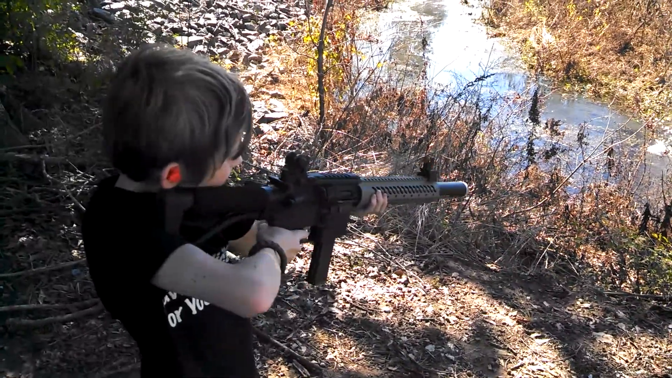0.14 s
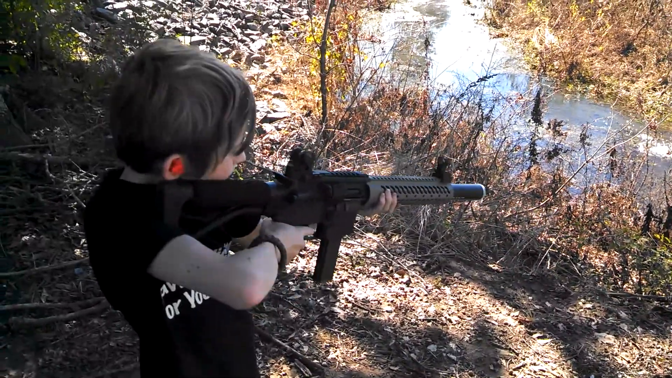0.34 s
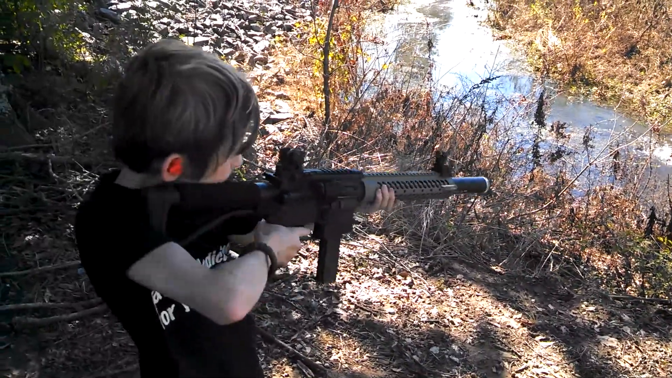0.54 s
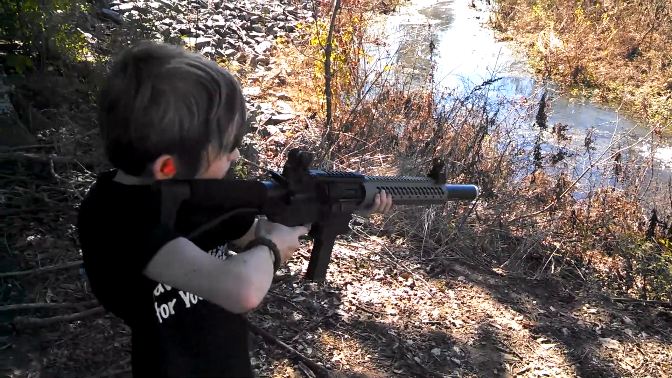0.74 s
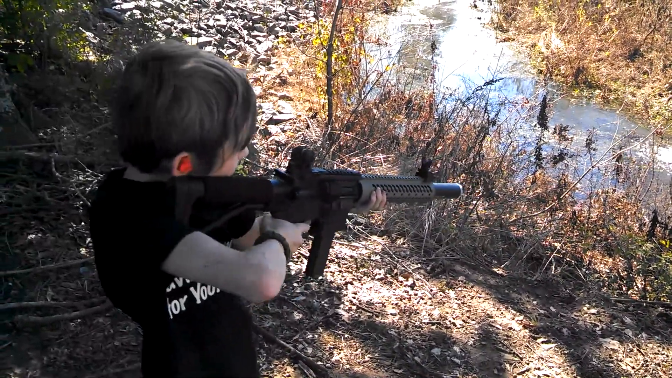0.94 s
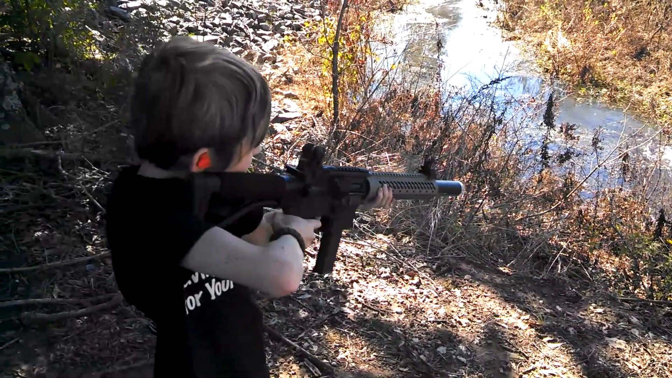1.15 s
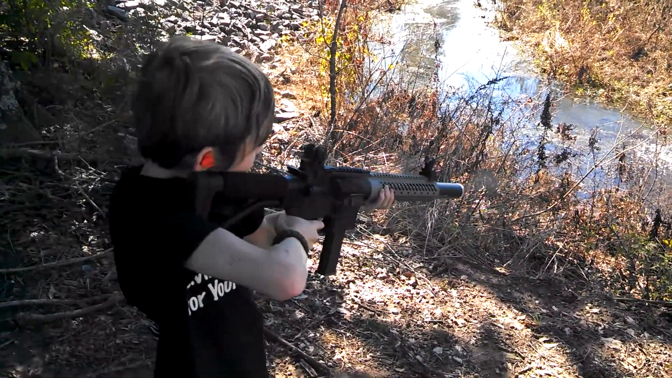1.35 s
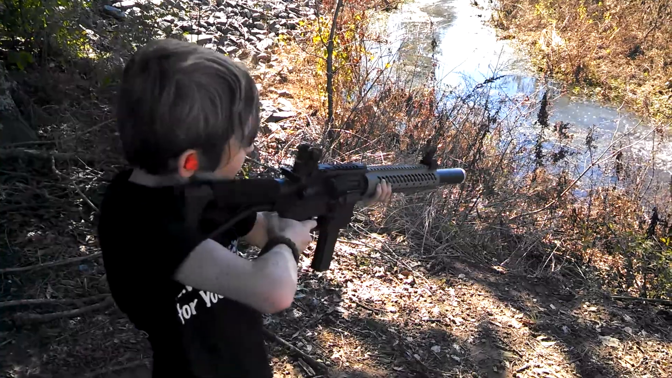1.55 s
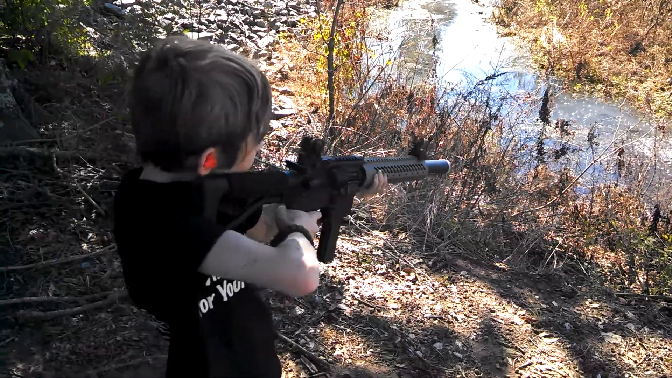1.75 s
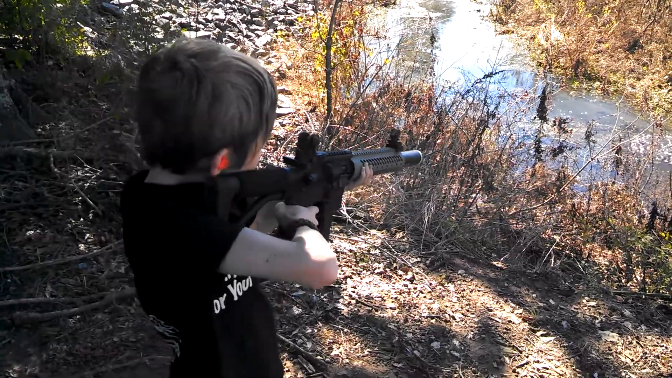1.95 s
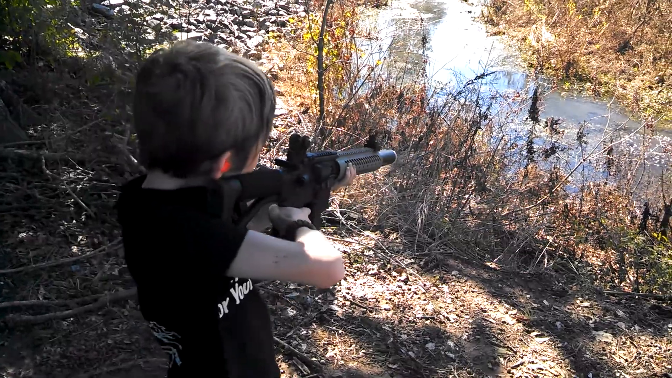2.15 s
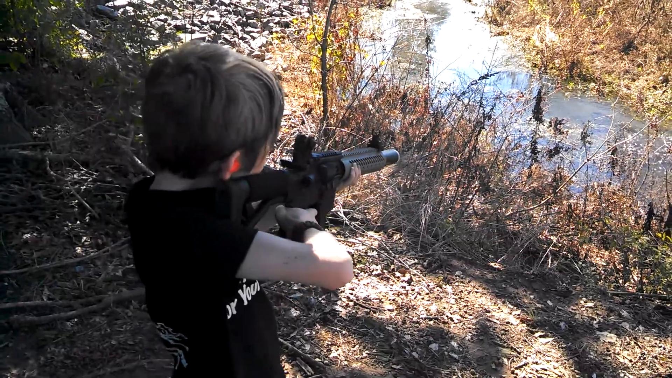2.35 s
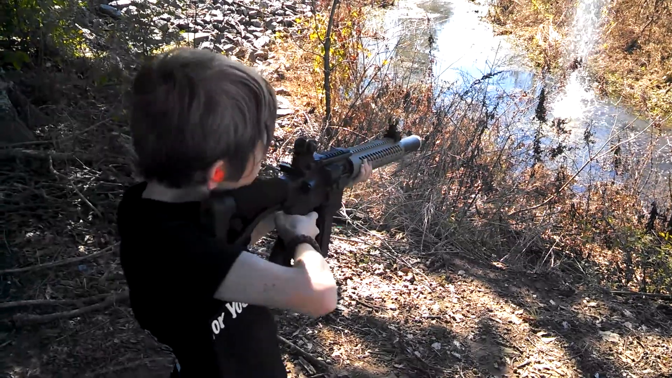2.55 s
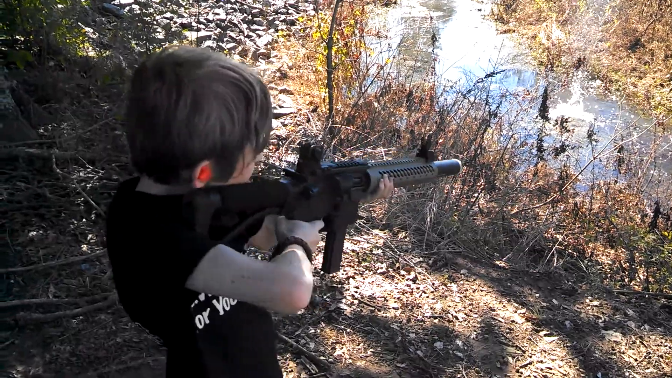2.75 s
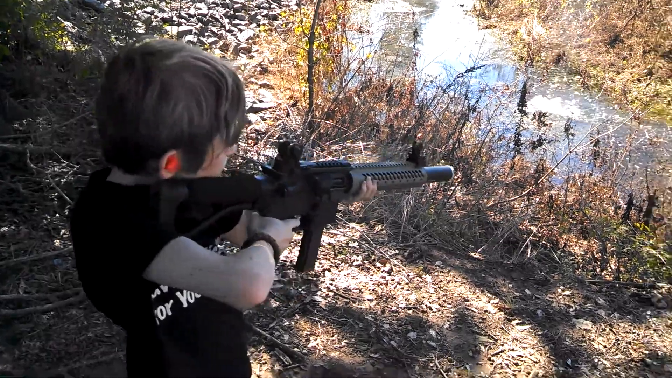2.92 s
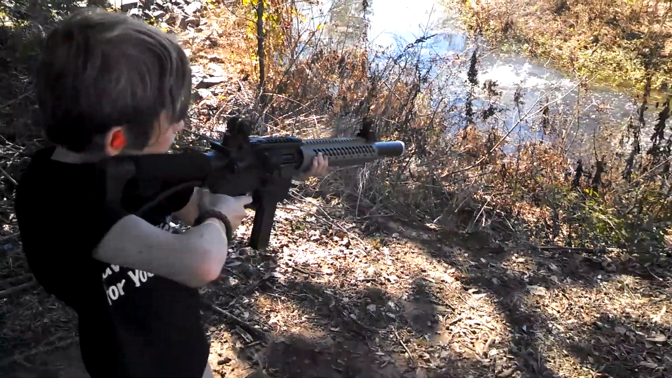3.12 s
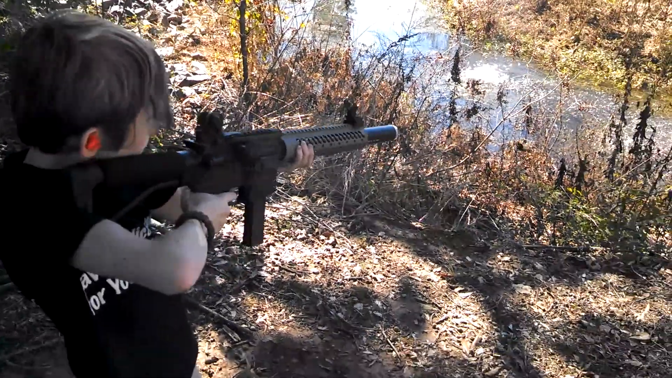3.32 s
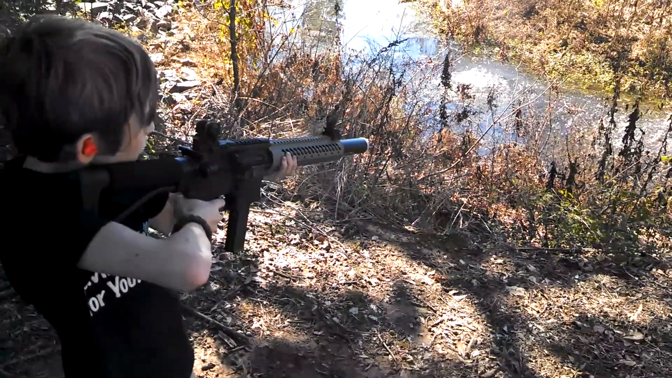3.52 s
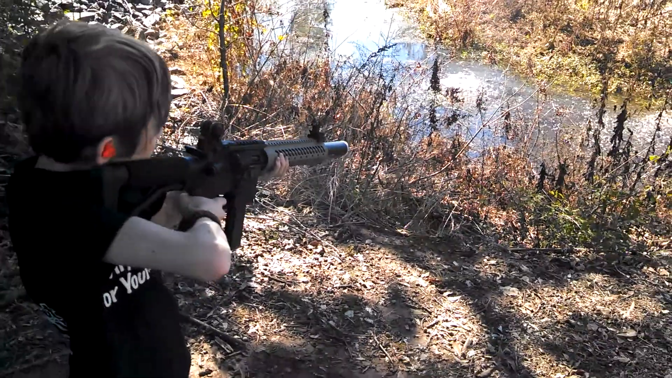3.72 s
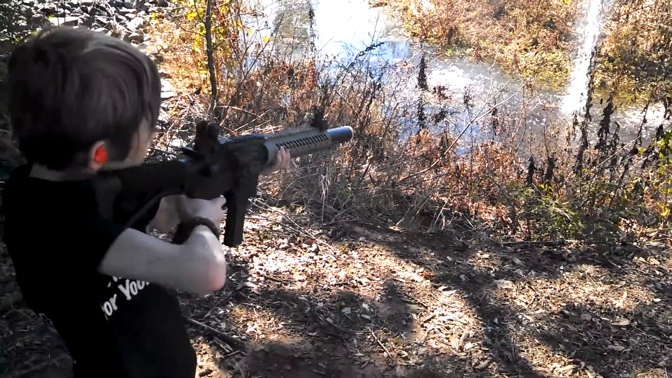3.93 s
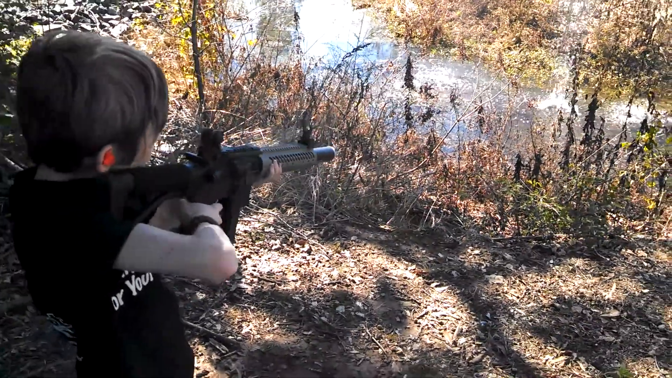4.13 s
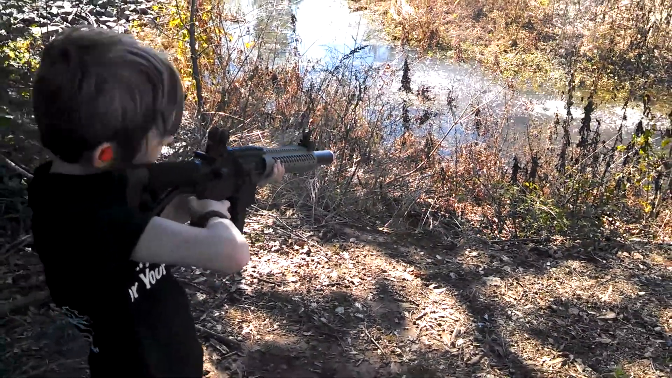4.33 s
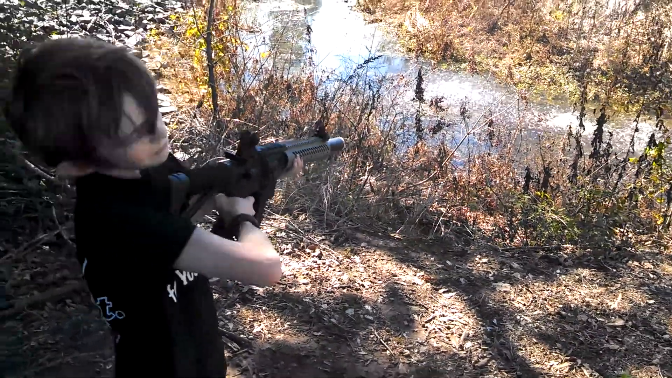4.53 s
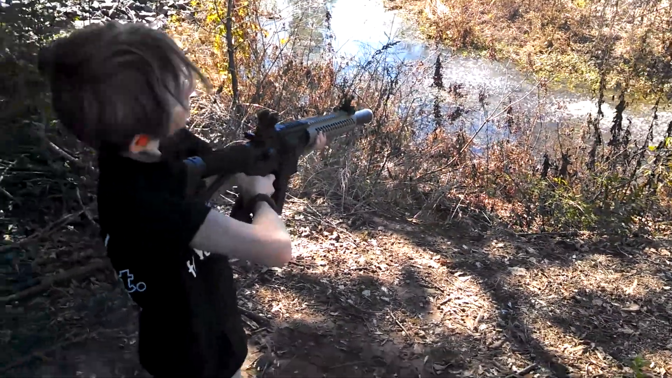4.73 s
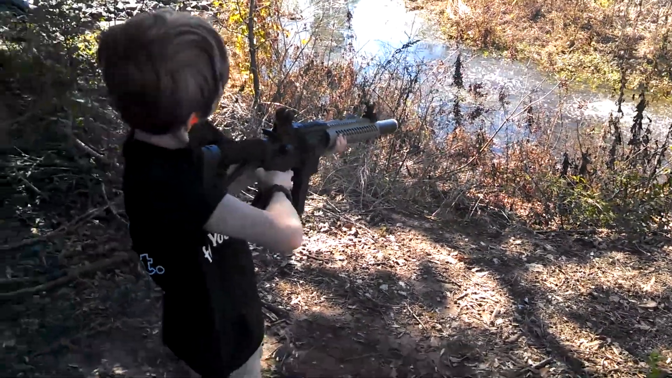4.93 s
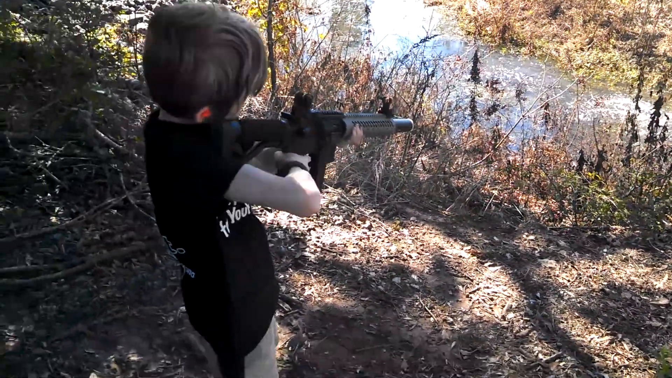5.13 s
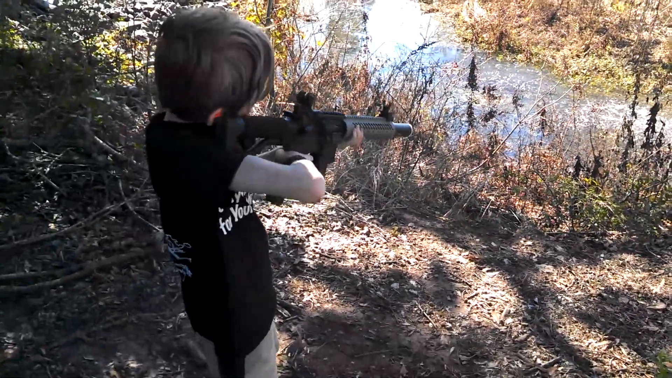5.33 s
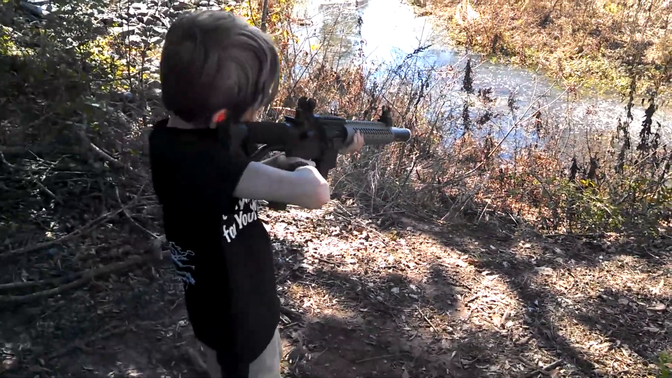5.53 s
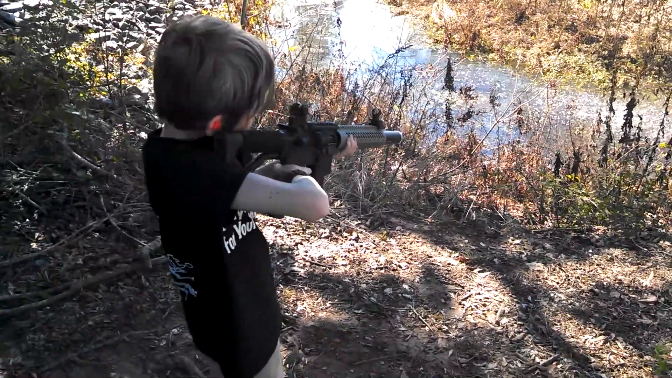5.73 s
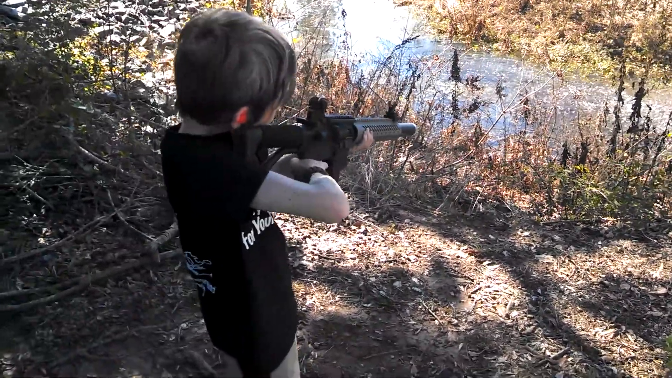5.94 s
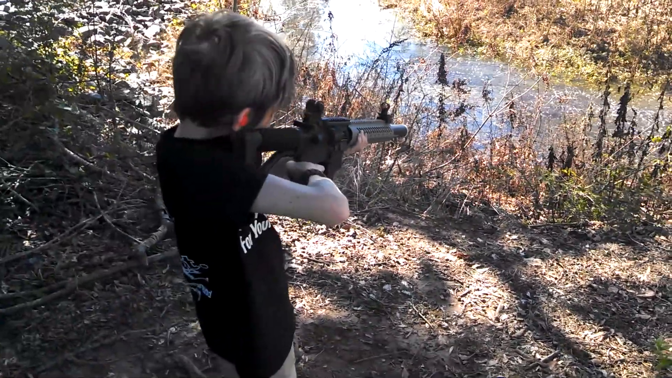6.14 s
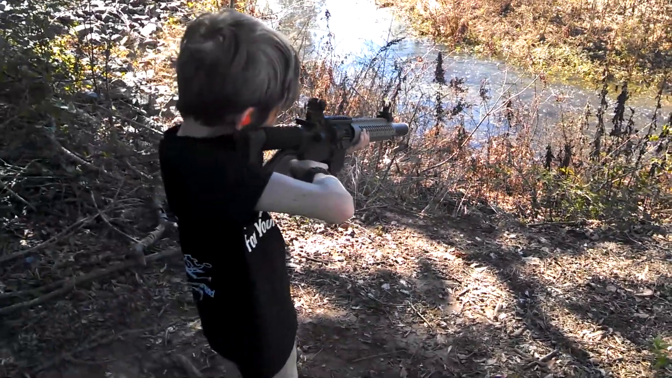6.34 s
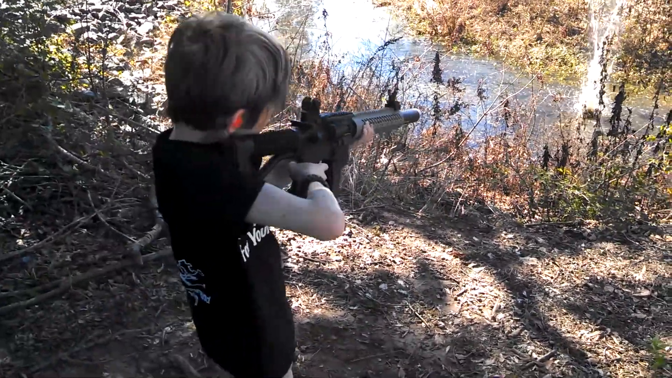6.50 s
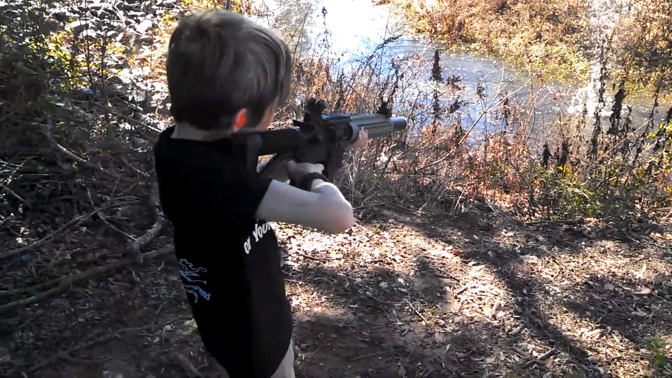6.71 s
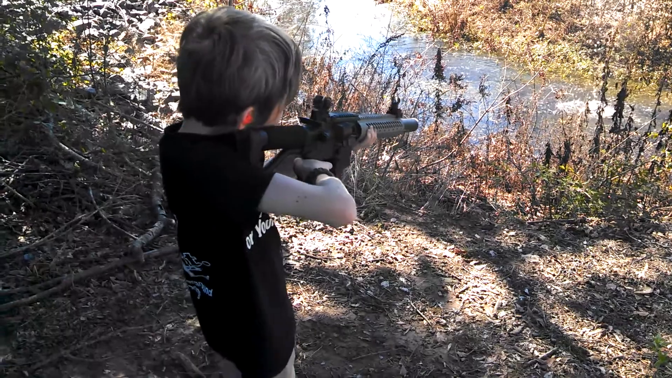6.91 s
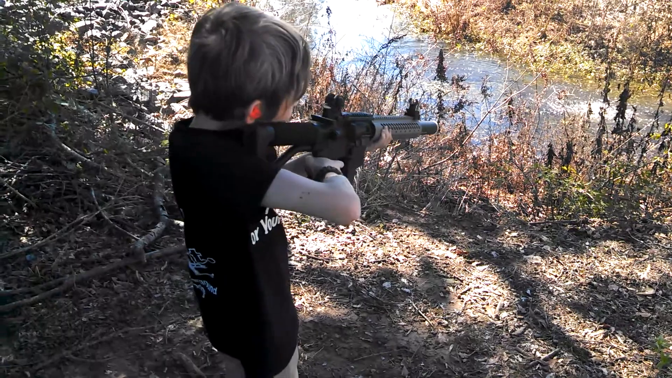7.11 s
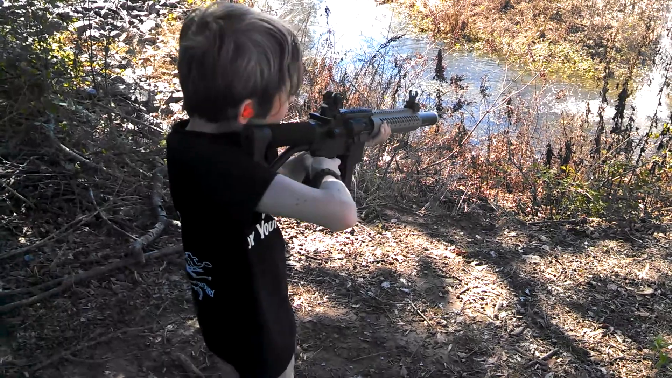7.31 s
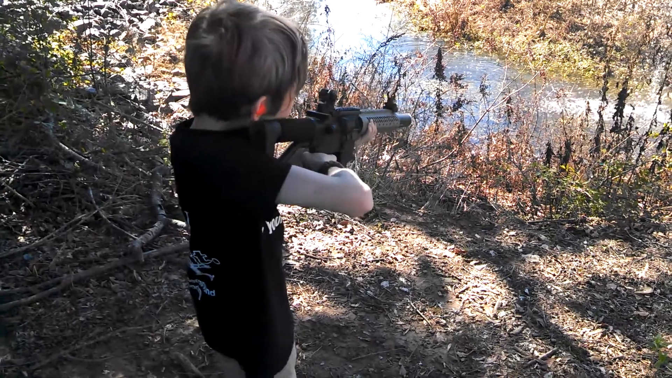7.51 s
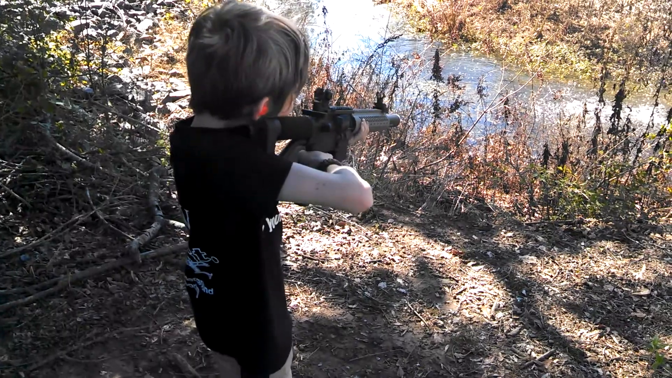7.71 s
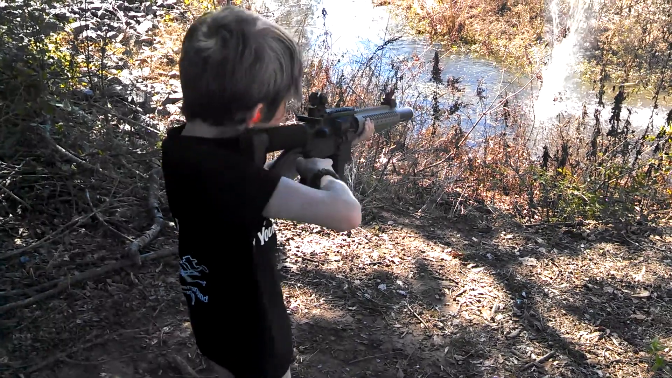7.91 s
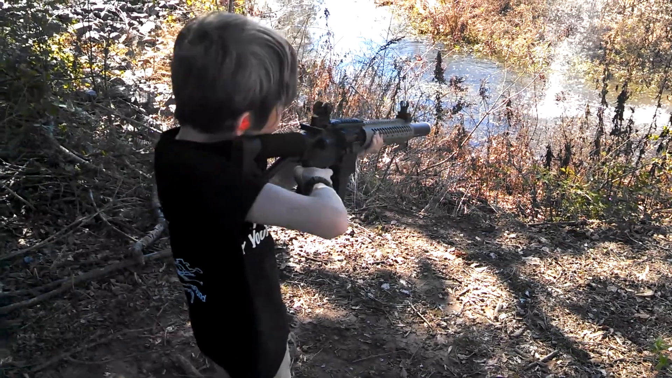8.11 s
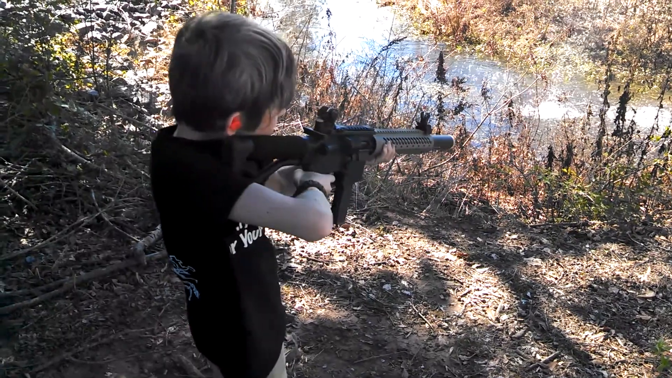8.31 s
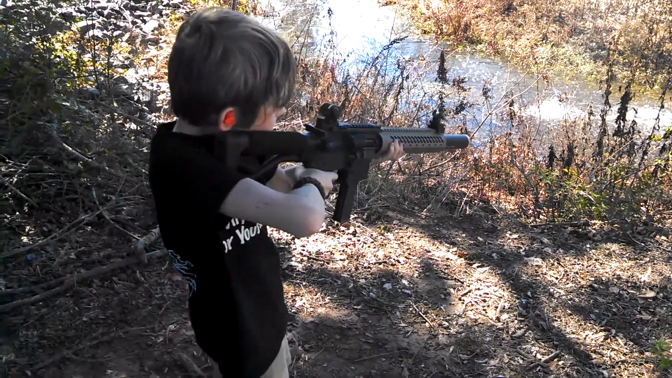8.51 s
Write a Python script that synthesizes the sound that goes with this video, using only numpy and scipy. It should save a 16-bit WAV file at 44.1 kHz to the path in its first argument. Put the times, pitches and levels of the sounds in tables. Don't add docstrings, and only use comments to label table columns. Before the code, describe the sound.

Outdoors on a brushy creek bank, a suppressed rifle fires eight separate shots close to a small stereo camera. Each is a short muffled thump with a gas hiss, a sharp metallic bolt clack, then a faint bullet splash and dull echo. Five shots come first, then a pause with twig snaps, rustling leaves, wind puffs and rising motor whine, then three more.

```python
import sys
import numpy as np
from scipy import signal
from scipy.fft import rfft, irfft, next_fast_len
from scipy.io import wavfile
from scipy.ndimage import uniform_filter1d

SR = 44100
rng = np.random.default_rng(int(sys.argv[2]) if len(sys.argv) > 2 else 0)


def unload_wav(signal):
    wavfile.write(
        sys.argv[1],
        SR,
        np.round(np.clip(np.atleast_2d(signal).T, -1, 1) * 32767).astype(np.int16),
    )


def linear_from_db(decibels):
    return 10 ** (np.asarray(decibels, float) / 20)


N = 381906


def evened(x):
    return x / np.sqrt(np.mean(x ** 2) + 1e-20)


def read(points, hz, column=1):
    table = np.array(points, float)
    return np.interp(np.log(hz + 1), np.log(table[:, 0] + 1), table[:, column])


def along(curve):
    return np.interp(np.arange(N) / SR, *np.transpose(curve))


def add(power, s, rise, t60, db):
    part = power[round(s * SR):][:round(1.2 * t60 * SR)]
    t = np.arange(len(part)) / SR
    pressure = linear_from_db(db - 60 * t / t60) * (1 - np.exp(-t / max(rise, 1e-4)))
    part += pressure ** 2


def flutter(samples, depth_db):
    slow = rng.standard_normal(N)
    for _ in range(2):
        slow = uniform_filter1d(slow, int(samples))
    return evened(linear_from_db(depth_db * evened(slow)))


def ring(x, hz, width):
    b, a = signal.iirpeak(hz, hz / width, SR)
    return signal.lfilter(b, a, signal.lfilter(b, a, x))


# (frequency [Hz], difference against sum [dB], likeness of the two [-1..1], phase turn [rad])
CAPSULE_PAIR = [(60, -6, -.5, 0.94), (300, -8, -0.45, 0.81), (700, -2.5, -0.14, 0.28),
                (1500, -1, .05, 0.083), (4000, 0.5, 0.28, 0.053), (8500, -0.5, 0.61, 0.05),
                (11000, 0, -.2, 0.1), (14000, -0.5, -.5, 0.084)]


def pair():
    hz = np.fft.rfftfreq(next_fast_len(N), 1 / SR)
    shared, own = rng.standard_normal((2, len(hz), 2)) @ [1, 1j]
    same = np.clip(read(CAPSULE_PAIR, hz, column=2), -1, 1)
    turn = np.exp(1j * read(CAPSULE_PAIR, hz, column=3))
    difference = same * turn * shared + np.sqrt(1 - same ** 2) * own
    spectra = np.array([shared, linear_from_db(read(CAPSULE_PAIR, hz)) * difference])
    return hz, spectra, irfft(spectra, next_fast_len(N))[:, :N]


def white_noise(white, shift):
    return np.roll(white[-1], shift, axis=1)


def heard(colour, white):
    hz, spectra, _ = white
    noise = irfft(linear_from_db(read(colour, hz)) * spectra, next_fast_len(N))
    return evened(np.roll(noise, rng.integers(N), axis=1)[:, :N])


# (blast time [s], blast level [dB], hammer level [dB], splash delay [s])
ROUNDS = [(0.5455, -4.5, -7, .1565), (1.4155, -4, -6, .17), (2.42, -4, -5, .1515), (3.263, -4, -6, .167),
          (3.8185, -3.5, -11, .1695), (6.436, -3.5, -3.5, .193), (7.184, -4.5, -10, .17),
          (7.851, -4.5, -9, .1745)]
# (thrown back [s], level [dB], slammed home [s], level [dB])
CYCLES = [(0.595, -14, 0.6045, -7), (1.4575, -13.5, 1.4725, -6.5), (2.4705, -11.5, 2.4765, -6),
          (3.3115, -12.5, 3.319, -5.5), (3.864, -12, 3.875, -5.5), (6.481, -11, 6.49, -4.5),
          (7.231, -11, 7.243, -6.5), (7.893, -12, 7.904, -7)]
LOCK_S, SPLASH_DB = .0078, -20
# (time [s], level [dB])
HAMMER = [(s - LOCK_S, hammer_db) for s, _, hammer_db, _ in ROUNDS]
BLAST = [(s, db) for s, db, _, _ in ROUNDS]
BOLT_BACK = [row[:2] for row in CYCLES]
BOLT_HOME = [row[2:] for row in CYCLES]
SPLASH = [(s + after, db + SPLASH_DB) for s, db, _, after in ROUNDS]
# (delay [s], rise [s], t60 [s], level [dB])
PARTS = [
    (HAMMER, [(0, 0.0026, .03, -18), (0, .001, .02, -22), (0, .001, 0.018, -19.5), (0, 0.0008, .016, -9)]),
    (BLAST, [(0, 0.0032, .1, -3.5), (0, 0.0013, 0.072, -7), (0, 0.00045, .05, -14), (0, 0.00045, .04, -9)]),
    (BLAST, [(0.031, 0.014, .3, -17.5), (0, .002, 0.45, -29), (0, 0.0012, .3, -22), (0, 0.0012, 0.29, -9.5)]),
    (BOLT_BACK, [(0, .002, .04, 3.5), (0, .001, 0.03, -9.5), (0, .001, .03, -15), (0, .002, .04, -12)]),
    (BOLT_HOME, [(0, .003, 0.088, -3), (0, .0015, 0.055, -8.5), (0, .0012, .045, -12), (0, .001, 0.058, -4.8)]),
    (SPLASH, [(0.00051, 0.0033, .05, -15.5), (0.001, .002, 0.06, -10), (0, 0.0004, 0.045, -4.5), (0.0003, .0005, 0.03, -5.5)]),
]
# (frequency [Hz], density [dB per Hz])
THUD = [(25, -25.5), (50, 5), (100, 2), (250, -3.5), (450, -10.5), (900, -36.5), (2000, -59)]
BODY = [(150, -28), (400, -2), (900, 0.5), (1500, -5.5), (2300, -1.5), (4000, -10.5), (8000, -46.5)]
CLACK = [(700, -28.5), (1500, -3.5), (2500, 0), (4300, -0.5), (5500, -7), (8000, -29)]
GAS = [(800, -28.5), (2000, -6.5), (3500, 3), (6000, 1), (9000, -1), (13000, 2), (17000, -1)]


def rifle(white):
    power = np.zeros((4, N))
    for events, layers in PARTS:
        for s, db in events:
            for k, (delay, rise, t60, layer_db) in enumerate(layers):
                add(power[k], s + delay, rise, t60, db + layer_db)
    thud, body, clack, gas = np.sqrt(power)
    metal = body * flutter(60, 3.5) * heard(BODY, white)
    metal = metal + clack * flutter(40, 3.5) * heard(CLACK, white)
    return thud * heard(THUD, white) + metal + gas * flutter(30, 2.3) * heard(GAS, white)


# (delay [s], start pitch [Hz], end pitch [Hz], t60 [s], level [dB])
PUSHES = [
    (BLAST, (0, 479.5, 89.5, 0.1, -12)),
    (BLAST, (.0012, 1500, 500, .012, -13)),
    (BOLT_BACK, (.001, 331.5, 220, 0.035, -3)),
    (BOLT_HOME, (.002, 260, 90, 0.075, -4.5)),
]


def pushes():
    out, t = np.zeros(N), np.arange(6000) / SR
    for events, (delay, start_hz, end_hz, t60, push_db) in PUSHES:
        for (s, db), spread in zip(events, rng.uniform(.85, 1.15, len(events))):
            hz = spread * (end_hz + (start_hz - end_hz) * np.exp(-t / (.12 * t60)))
            swing = linear_from_db(db + push_db - 60 * t / t60) * np.sin(2 * np.pi * np.cumsum(hz) / SR)
            out[round((s + delay) * SR):][:len(t)] += swing
    return out * np.array([[-1.3], [.9]])


# (delay [s], rise [s], t60 [s], level [dB], centre [Hz], width [Hz])
ECHO = (0.17, 0.16, 0.03, -41.5, 3700, 1298)


def far_bank(white):
    delay, rise, t60, db, hz, width = ECHO
    power = np.zeros(N)
    for s, blast_db in BLAST:
        add(power, s + delay, rise, t60, blast_db + db)
    return np.sqrt(power) * evened(ring(white_noise(white, 0), hz, width))


# (time [s], peak level [dB], ring [Hz], brightness [dB])
TICKS = [(0.397, -43, 3463, -2), (0.459, -37.5, 2310, -2), (0.506, -39, 510, -3), (1.025, -42, 1100, -4),
         (0.5715, -10, 330, -9), (1.132, -41.5, 3900, -21.5), (1.225, -43, 3560, -3),
         (1.345, -33.5, 2070, -12), (1.38, -35.5, 2060, -4), (2.066, -42, 883, -11),
         (2.111, -36, 2090, -16), (2.156, -41, 4140, -13), (2.183, -42, 3710, 5), (5.066, -45, 4580, 4),
         (3.581, -30.5, 2070, -23), (3.599, -32.5, 2060, -11), (4.735, -45, 4600, 5),
         (4.595, -29.5, 2050, -12), (4.801, -31.5, 1100, -17), (5.153, -34.5, 3430, -4.5),
         (5.24, -29, 2050, -9), (5.251, -24, 2270, -12), (5.342, -38.5, 4590, 3),
         (5.609, -30.5, 3520, -3.5), (5.724, -27, 1480, -4), (5.824, -28, 3260, -6),
         (6.912, -42, 3170, -10.5), (7.661, -44, 3980, -15), (8.331, -38, 4500, -11), (8.509, -43, 789, -9)]
# (start [s], pitch [Hz], t60 [s], level [dB])
PLOP = (5.785, 450, 0.22, -42)
# (frequency [Hz], density [dB per Hz])
CRACK = [(2500, -31), (6000, 0.5), (16000, -3.5)]


def ticks(white):
    out, noise, bright = np.zeros((2, N)), white_noise(white, 60000), np.zeros(N)
    t = np.arange(1300) / SR
    for s, db, hz, bright_db in [*TICKS, *crackles()]:
        at = round(s * SR)
        burst = evened(ring(noise[:, at:at + len(t)], hz, 1.1 * hz)) * linear_from_db(-3.5 - 60 * t / .017)
        burst[0] += linear_from_db(2.5 - 60 * t / .008) * np.sin(2 * np.pi * hz * t)
        out[:, at:at + len(t)] += burst * linear_from_db(db) * (1 - np.exp(-t / 0.00036))
        add(bright, s, .0003, .015, db + bright_db + .3)
    s, hz, t60, db = PLOP
    t = np.arange(6000) / SR
    bubble = linear_from_db(db - 60 * t / t60) * (1 - np.exp(-t / .006)) * np.sin(2 * np.pi * hz * t)
    out[0, round(s * SR):][:len(t)] += bubble
    return out + np.sqrt(bright) * heard(CRACK, white)


# (time [s], level above calm [dB])
BREEZE = [(0, -3.5), (0.5, -2.5), (1.2, -0.5), (2.0, 0.5), (3.2, 0), (4.2, 0.5), (4.87, 2), (5.38, 10.5),
          (5.85, 17), (6.0, 11), (6.15, 3), (6.43, 0), (6.55, -7.5), (7.2, -4), (7.8, 0), (8.2, -8),
          (8.66, -2.5)]
CRACKLES_PER_S, CRACKLE_DB, CRACKLE_HZ, CRACKLE_SPREAD_DB = 44, -48.5, 3300, 2
CRACKLE_FOLLOWS, CALM_SHARE, FULL_BREEZE_DB = .7, .2, 14


def crackles():
    place, size, pitch, bright, luck = rng.random((round(CRACKLES_PER_S * N / SR), 5)).T
    s = (np.arange(len(place)) + place) / CRACKLES_PER_S * .99
    breeze_db = np.interp(s, *np.transpose(BREEZE))
    db = CRACKLE_DB + CRACKLE_FOLLOWS * breeze_db - CRACKLE_SPREAD_DB * np.log(size)
    hz = CRACKLE_HZ * (.9 + .3 * pitch ** 2)
    rows = np.transpose([s, np.minimum(db, -32), hz, -4 - 14 * bright])
    return rows[luck < np.maximum(breeze_db / FULL_BREEZE_DB, CALM_SHARE)]


# (time [s], level [dB])
MOTOR = [(0, -76), (2.4, -68), (4.2, -70), (4.5, -65), (5.7, -57.5), (6.0, -50.5), (6.42, -50),
         (6.5, -68.5), (8.66, -70)]
# (multiple of the shaft rate, level [dB])
WHINE = [(24, -65), (26, -61), (27, -67), (31, -68), (32, -64), (33, -58.5), (34, -57), (35, -63.5),
         (39, -56), (41, -61), (43, -60.5), (45, -69.5), (47, -63), (50, -67)]
# (frequency [Hz], level [dB])
BUZZ = [(3600, -98), (4200, -74), (4900, -84), (5750, -69), (6400, -84), (7700, -77), (8500, -74),
        (9600, -88)]
# (centre [Hz], width [Hz], level against the lines [dB])
HUM = (1290, 230, -11)
SHAFT_HZ = 176.27


def motor(white):
    size, thirds = next_fast_len(N), np.arange(60, 165) * SHAFT_HZ / 3
    lines = [(round(multiple) * SHAFT_HZ, db) for multiple, db in WHINE]
    lines += zip(thirds + .3, read(BUZZ, thirds) + 3.5 * rng.standard_normal(len(thirds)))
    spectrum = np.zeros((2, size // 2 + 1), complex)
    for (hz, db), phase in zip(lines, rng.random((len(lines), 2))):
        spectrum[:, round(hz * size / SR)] = linear_from_db(db) * np.exp(2j * np.pi * phase)
    whine = evened(irfft(spectrum, size)[:, :N])
    hz, width, db = HUM
    hum = linear_from_db(db) * evened(ring(white_noise(white, 30000), hz, width))
    return linear_from_db(along(MOTOR)) * (whine + hum)


# (start [s], stop [s], centre [Hz], width [Hz], throbs [per s], level [dB])
CRICKET = (2.12, 2.885, 12601, 1400, 48, -55)


def cricket(white):
    start, stop, hz, width, rate, db = CRICKET
    t = np.arange(N) / SR
    swell = np.clip((t - start) / .3, 0, 1) * (t < stop)
    throb = np.cos(np.pi * rate * t) ** 4
    return linear_from_db(db) * swell * throb * evened(ring(white_noise(white, 0), hz, width))


# (frequency [Hz], density [dB per Hz])
LEAVES = [(300, -20.5), (800, -3), (1300, -3), (2100, 3), (3300, 5), (6000, -1), (9000, -4), (12000, -13)]
WATER = [(40, -15.5), (120, 0.5), (350, -1.5), (700, -13), (1500, -29.5)]
HISS = [(8000, -24.5), (11000, -6), (13300, -0.5), (15000, -2.5), (17000, -4)]
# (leaves level [dB], fall [dB per s], water level [dB], fall [dB per s])
VALLEY = (-49, 24.5, -48, 31)
EARLIER_SHOT_S = -.2
LEAVES_DB, LEAVES_FOLLOW, HISS_DB, WATER_DB = -59, .5, -56.5, -69.5
RUSTLE_DB = -66
DUCK_DB, RECOVER_S = -12.5, 0.26
DRONE_DB, WHIRR_DB = -8, 3


def air(white):
    t, blasts = np.arange(N) / SR, np.array([EARLIER_SHOT_S] + [s for s, _ in BLAST])
    since = t - blasts[np.searchsorted(blasts, t) - 1]
    breeze_db, motor_db = along(BREEZE), along(MOTOR)
    leaves_db, leaves_fall, water_db, water_fall = VALLEY
    stirred = linear_from_db(LEAVES_DB + LEAVES_FOLLOW * np.maximum(breeze_db, 0))
    leaves = np.hypot(stirred, linear_from_db(leaves_db - leaves_fall * since))
    water = np.hypot(linear_from_db(WATER_DB), linear_from_db(water_db - water_fall * since))
    water = np.hypot(water, linear_from_db(motor_db + DRONE_DB))
    hiss = linear_from_db(HISS_DB + breeze_db + DUCK_DB * np.exp(-since / RECOVER_S))
    hiss = np.hypot(hiss, linear_from_db(motor_db + WHIRR_DB))
    rustle = linear_from_db(RUSTLE_DB + breeze_db) * flutter(70, 4.5) * flutter(700, 2.5) * heard(CRACK, white)
    return (rustle + leaves * flutter(150, 1.4) * flutter(1500, 1.6) * heard(LEAVES, white)
            + water * flutter(1200, 1.5) * heard(WATER, white) + hiss * flutter(300, 1.5) * heard(HISS, white))


# (middle [s], length [s], level [dB])
PUFFS = [(0.036, .1, -62), (0.9, 0.11, -69), (1.75, .12, -67), (2.717, 0.089, -65), (4.423, 0.11, -57.5),
         (4.542, 0.07, -56.5), (4.672, .11, -54.5), (4.79, .09, -53), (5.077, 0.079, -56.5),
         (5.17, 0.09, -63.5), (5.253, .09, -55), (5.408, 0.052, -71), (5.768, .12, -55), (5.85, .07, -59),
         (6.01, .1, -59), (6.132, .14, -54), (6.207, .08, -53), (6.28, 0.074, -50), (6.384, .12, -48.5)]
# (frequency [Hz], density [dB per Hz])
GUST = [(20, -36), (40, -11), (70, 0), (120, -9), (200, -23), (400, -46)]
CALM_DB = -69.5


def wind(white):
    t, level = np.arange(N) / SR, linear_from_db(CALM_DB) * flutter(1800, 6.5)
    for s, length, db in PUFFS:
        near = slice(max(round((s - length) * SR), 0), round((s + length) * SR))
        level[near] += linear_from_db(db) * np.cos(np.pi / 2 * (t[near] - s) / length) ** 4
    return linear_from_db(12.5) * level * flutter(900, 1.5) * heard(GUST, white)


def scene():
    white = pair()
    sources = (rifle, far_bank, ticks, air, motor, cricket, wind)
    total, difference = pushes() + sum(source(white) for source in sources)
    return np.array([total + difference, total - difference]) * linear_from_db(-4)


def top_cut(x):
    return signal.sosfilt(signal.butter(12, 16670, fs=SR, output="sos"), x)


# (frequency [Hz], gain [dB])
MICROPHONE = [(30, 0), (3500, -2), (6500, -1), (8500, 4.5), (10800, -3), (13000, 2), (15300, 2)]
EDGE_HZ = 15480
CROSS, CROSS_SAMPLES, LEFT_DB = 0.98, 16, -1.37


def record(dry):
    size = next_fast_len(N)
    hz = np.fft.rfftfreq(size, 1 / SR)
    edge = linear_from_db(-45) + 1 / (1 + (hz / EDGE_HZ) ** 200)
    x = irfft(rfft(dry, size) * linear_from_db(read(MICROPHONE, hz)) * edge, size)[:, :N]
    late = np.pad(x[::-1], ((0, 0), (CROSS_SAMPLES, 0)))[:, :N]
    wide = (x - CROSS * late) * linear_from_db(np.array([[LEFT_DB], [0]]))
    return top_cut(wide)


dry = scene()
out = record(dry)
unload_wav(out)
```